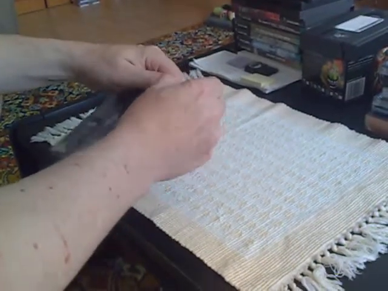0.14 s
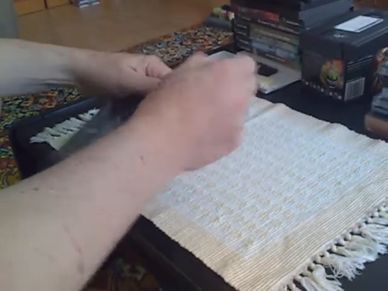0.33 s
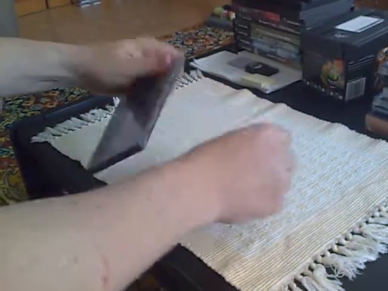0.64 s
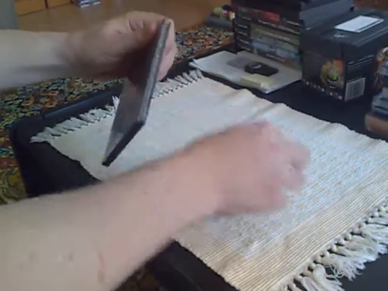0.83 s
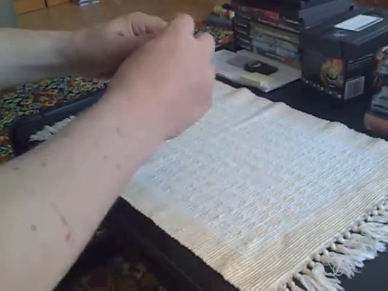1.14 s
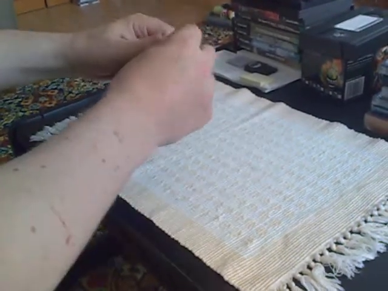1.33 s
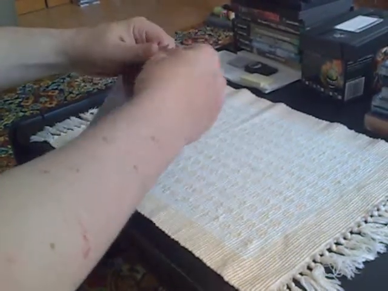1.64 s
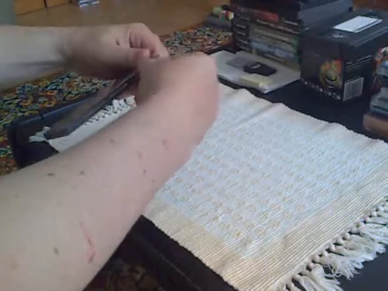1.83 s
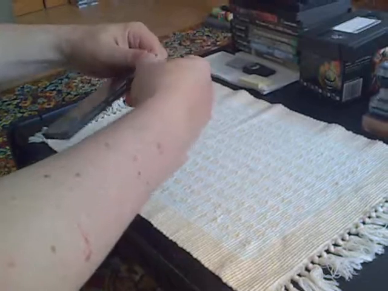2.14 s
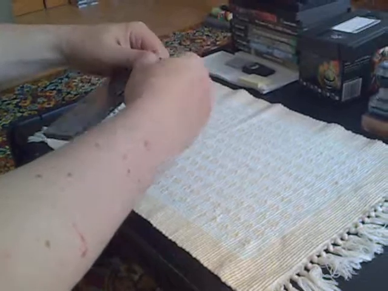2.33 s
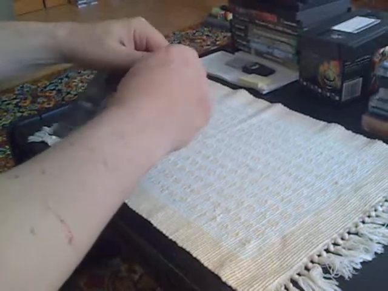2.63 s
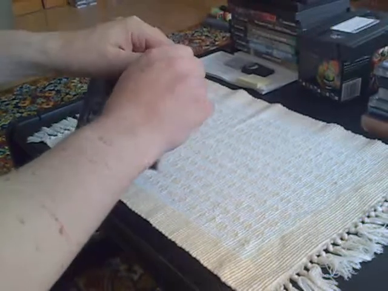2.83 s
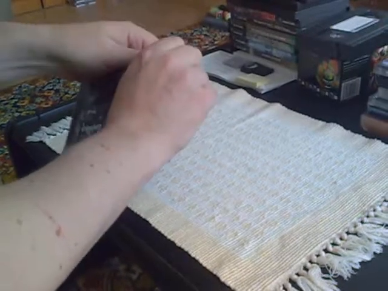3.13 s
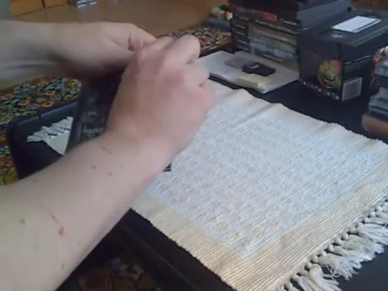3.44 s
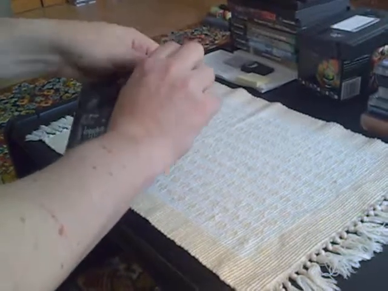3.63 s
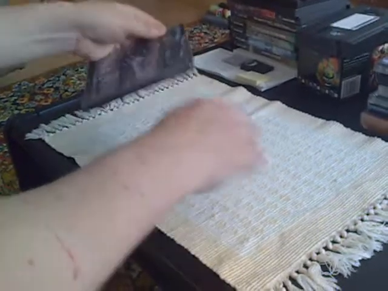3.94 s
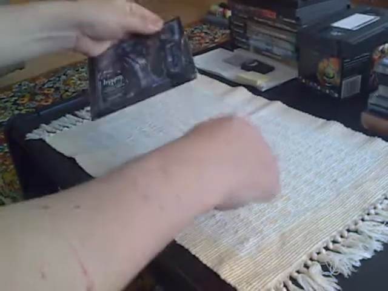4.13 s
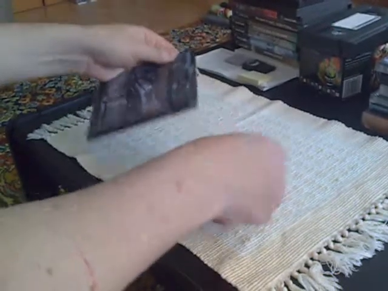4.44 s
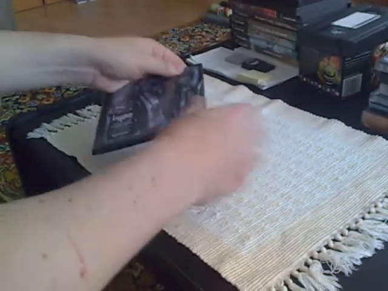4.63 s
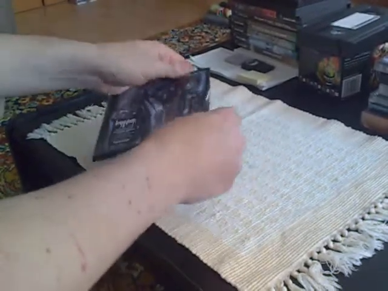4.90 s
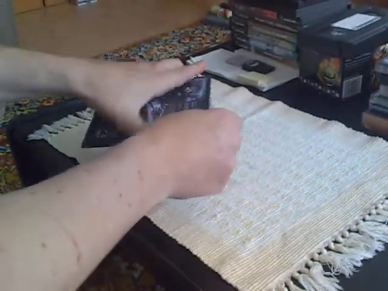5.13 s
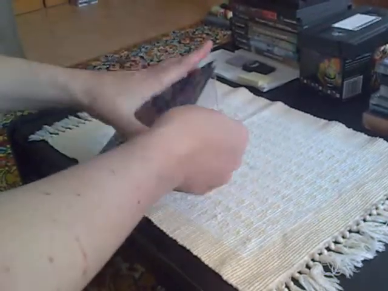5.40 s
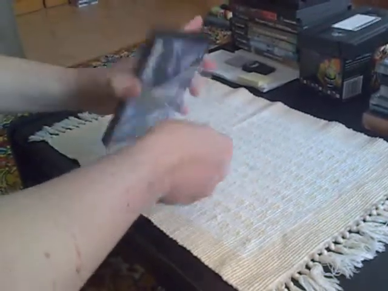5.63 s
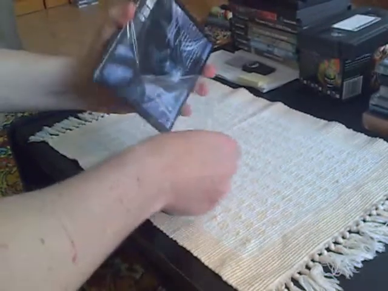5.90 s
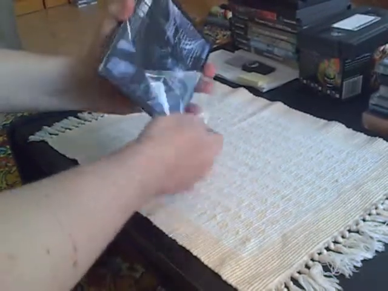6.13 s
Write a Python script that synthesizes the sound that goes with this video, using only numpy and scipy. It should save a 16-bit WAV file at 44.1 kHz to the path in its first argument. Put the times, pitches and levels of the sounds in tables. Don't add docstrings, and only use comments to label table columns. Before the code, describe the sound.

Close plastic wrap crinkles and snaps under fingers, tears in a crackling run, then comes free of its case with hard, bright cracks.

```python
import sys
import numpy as np
from scipy import signal
from scipy.fft import rfft, irfft
from scipy.io import wavfile
from scipy.ndimage import uniform_filter1d

SR = 44100
rng = np.random.default_rng(int(sys.argv[2]) if len(sys.argv) > 2 else 0)


def amp(db):
    return 10 ** (np.asarray(db, float) / 20)


def write(x):
    x = np.atleast_2d(x).T
    wavfile.write(sys.argv[1], SR, np.round(np.clip(x, -1, 1) * 32767).astype(np.int16))


N = 276066

# (frequency [Hz], width [Hz], level [dB])
SHEET_MODES = [(2500, 840, 7), (1725, 1780, -4.5)]
# (frequency [Hz], width [Hz], level [dB])
FOLD_MODES = [(3680, 1020, -1.5), (5970, 1080, 0.2)]
# (frequency [Hz], width [Hz], level [dB])
CREASE_MODES = [(10070, 1740, 7), (6800, 640, 0.38), (14840, 4100, 3)]


def set_rms(x, db):
    return x * amp(db) / np.sqrt(np.mean(x ** 2))


def resonate(x, modes):
    out = 0
    for k, (hz, width, db) in enumerate(modes):
        b, a = signal.iirpeak(min(hz, 0.45 * SR), hz / width, fs=SR)
        out = out + (-1) ** k * amp(db) * signal.lfilter(b, a, x)
    return out


def unit_gain(modes):
    power = sum(amp(2 * db) * np.pi * width / SR for hz, width, db in modes)
    return 1 / np.sqrt(power)


def background():
    # (frequency [Hz], density [dB per Hz])
    floor_curve = [(15, -2.5), (25, -1.5), (40, 0.5), (55, -6.5), (70, -9), (122, -16), (250, -16),
                   (400, -22), (900, -24), (2500, -28), (6000, -33), (10000, -34), (14500, -28.5),
                   (16000, -27.5)]
    # (time [s], rumble level [dB])
    rumble_curve = [(0.0, -48.5), (1.1, -50.5), (1.8, -51.5), (3.3, -45), (3.9, -48.5), (4.3, -46),
                    (5.0, -48), (6.26, -46)]
    # (frequency [Hz], level [dB], start [s], end [s])
    hum_lines = [(120, -61.5, 0.326, 2.9), (115.5, -60.5, 5.4, 7.9), (79.5, -61, 1.15, 2.5),
                 (76, -63.5, 4.1, 6.7), (288, -61.5, 4.2, 6.1), (238, -70.5, 1.65, 3.5),
                 (309, -69, 1.38, 5.2)]
    t = np.arange(N) / SR
    hz = np.maximum(np.arange(N // 2 + 1) * SR / N, 1)
    floor_hz, floor_db = np.array(floor_curve).T
    spectrum = amp(np.interp(np.log(hz), np.log(floor_hz), floor_db)) * rfft(rng.standard_normal(N))
    spectrum *= amp(-48) / np.std(irfft(spectrum, N))

    low = 1 / (1 + (hz / 75) ** 8.6)
    hiss = irfft(spectrum * np.sqrt(1 - low), N)
    rumble = set_rms(irfft(spectrum * np.sqrt(low), N), 0)
    out = hiss + amp(np.interp(t, *np.array(rumble_curve).T)) * rumble

    for line_hz, db, start, end in hum_lines:
        gate = np.clip(np.minimum(t - start, end - t) / 0.028, 0, 1)
        drift = set_rms(uniform_filter1d(rng.standard_normal(N), size=SR // 2), -10.5)
        phase = 2 * np.pi * line_hz * t + 2.2 * drift
        out += gate * set_rms(np.sin(phase), db)
    return out


def room(x):
    # (delay [s], level [dB])
    wall_echoes = [(.0098, -14), (0.0116, -18.5), (0.017, -20)]
    # (frequency [Hz], t60 [s], level [dB])
    tail_bands = [(440, 0.18, -15.5), (950, 0.18, -24), (1665, 0.2, -20), (2650, 0.18, -18),
                  (4260, 0.14, -12), (6480, 0.13, -13), (9500, 0.14, -17.5), (14200, 0.12, -15.5)]
    echoes = np.zeros(2048)
    taps = np.arange(24)
    for delay, db in wall_echoes:
        start = int(delay * SR)
        scattered = np.abs(rng.standard_normal(24)) * (-0.5) ** taps ** 2
        echoes[start:start + 24] += amp(db) * set_rms(scattered, -10 * np.log10(24))
    out = x + signal.fftconvolve(x, echoes)[:N]

    t = np.arange(SR // 2) / SR
    build = 1 / (1 + np.exp(-(t - 0.0095) / 0.0031))
    scatter = rng.standard_normal(N)
    for hz, t60, db in tail_bands:
        band = [(hz, hz * 0.58, 0)]
        sent, back = resonate(resonate(np.array([x, scatter]), band), band)
        decay = build * np.exp(-np.log(1000) * t / t60)
        stored = signal.oaconvolve(sent ** 2, decay ** 2)[:N]
        out += amp(db - 10.5) * set_rms(back, 0) * np.sqrt(np.maximum(stored, 0))
    return out


def blows(events):
    out = np.zeros(N + 8192)
    t = np.arange(8192) / SR
    for s, db, hz, t60, rise_ms in events:
        start = int(s * SR)
        rise = 1 - np.exp(-t / (rise_ms / 1000))
        ring = np.sin(2 * np.pi * hz * t) * np.exp(-np.log(1000) * t / t60)
        out[start:start + 8192] += amp(db + 4.0) * rise * ring
    return out[:N]


def thuds():
    # (time [s], peak level [dB], frequency [Hz], t60 [s], rise [ms])
    thud_events = [(.538, -26, 107, 0.026, 2.8), (.539, -34.5, 260, 0.018, 1.3),
                   (2.535, -36.5, 134, 0.06, 3.1), (3.699, -24.5, 89, 0.046, 3.7),
                   (4.287, -30, 306, 0.11, 2.1), (5.29, -41.5, 108, 0.089, 2.7),
                   (5.512, -34.5, 204, 0.066, 2.1), (5.765, -37.5, 170, 0.066, 3.7)]
    return blows(thud_events)


def knocks():
    # (time [s], peak level [dB], frequency [Hz], t60 [s], rise [ms])
    knock_events = [(.366, -25.5, 962, 0.022, 0.65), (2.582, -33, 495, 0.017, 0.94),
                    (2.5803, -15.5, 2660, .012, .3), (2.583, -22.5, 950, 0.015, 0.27),
                    (2.737, -40, 600, 0.021, 0.71), (3.297, -36.5, 1570, 0.022, 0.61),
                    (4.232, -36, 600, 0.016, 0.58), (4.260, -42.5, 682, 0.11, 0.18),
                    (4.287, -17, 1410, 0.015, 0.27), (4.288, -37, 1052, 0.16, 0.36),
                    (4.288, -32.5, 580, 0.037, 0.67), (4.5438, -13, 1860, 0.0026, 0.13),
                    (4.544, -55, 734, 0.0061, 0.41), (5.456, -33, 440, 0.014, 0.55),
                    (5.511, -17, 2200, 0.014, 0.24), (5.512, -42, 480, 0.019, 0.67)]
    return blows(knock_events)


def rustle():
    # (start [s], hold [s], rustle level [dB], brightness [dB], sheet ring [dB])
    strokes = [(0.2, .1, -75, -7, 0), (0.734, 0.079, -65, 4.5, 5.5), (2.717, 0.064, -65, -2, 0),
               (2.87, .4, -63.5, -9, -16), (3.601, 0.012, -64, 2, 8), (3.771, 0.017, -46, -10, 4),
               (3.835, 0.22, -54, -19, -9), (3.923, 0.11, -54.5, 4.5, 6.5), (4.224, 0.068, -53.5, -30, -15),
               (4.5, 0.019, -61, -2, 3), (4.953, 0.61, -61, -15, -15), (5.664, 0.093, -48, -17, -2),
               (5.756, 0.17, -64, -1, 4), (6.146, .13, -51, -20, -10)]
    # (frequency [Hz], width [Hz], level [dB])
    rub_modes = [(1080, 1740, 0)]
    ticks_per_s, spread_db, grain_s = 2600, 1, 0.0003
    strength = amp(spread_db * np.minimum(rng.exponential(size=N), 5.0))
    ticks = (rng.random(N) < ticks_per_s / SR) * strength
    grain = np.sqrt(signal.lfilter([1], [1, -np.exp(-1 / (grain_s * SR))], ticks ** 2))

    t = np.arange(N) / SR
    weights = 0
    for s, hold, db, bright_db, sheet_db in strokes:
        rise_db = 503 * np.maximum(s - t, 0)
        fall_db = 203 * np.maximum(t - s - hold, 0)
        weights = weights + amp([[0], [bright_db], [sheet_db]]) * amp(db - rise_db - fall_db)
    bodies = [set_rms(resonate(rng.standard_normal(N), modes), 0)
              for modes in (rub_modes, FOLD_MODES + CREASE_MODES, SHEET_MODES)]
    return set_rms(grain, 0) * np.sum(weights * bodies, axis=0)


def small_creases(events, case_db, sheet_db, fine_db):
    burst_ms = 1.8
    return [(s, db, case_db + slack, sheet_db + slack, fine_db - slack, burst_ms)
            for s, db, slack in events]


def snaps():
    # (time [s], peak level [dB], case share [dB], sheet share [dB], fine-crease share [dB])
    big_snaps = [(0.207, -32, -12.5, -13.5, -16), (0.321, -32.5, -20, -14, -3),
                 (0.3347, -20, -5.5, -10.5, -16), (0.3404, -9.5, -20, -14, -1.5),
                 (0.3662, -27, -7, -9, 1.5), (2.516, -38, -16, -25, 3.5), (2.581, -19.5, -6, -4.5, 1),
                 (2.7365, -21.5, -9.5, -10, -3), (2.8434, -22.5, -15.5, -17.5, 1),
                 (3.2964, -33.5, -4.5, -11, -17), (3.7445, -26, -20, -37, 0.5), (3.8423, -25, -10, -6.5, 4),
                 (4.2303, -51, 12, 3, -8), (4.2584, -32.5, -2, 0, 9), (4.2859, -17.5, -6, -15, -3.5),
                 (4.5422, -40, 8.5, 3, -25), (5.3832, -15, -24.5, -34, -7), (5.4539, -9.5, -9, -15.5, -3),
                 (5.51, -13.5, -1.5, -5.5, -6), (5.659, -30.5, -3.5, -0.5, 1), (5.7293, -19.5, -4, -14, -4),
                 (5.974, -32, -17.5, -21, -0.5), (6.1562, -25, -14.5, -32, -6),
                 (6.2012, -28.5, -14, -12, 2)]
    # (time [s], peak level [dB], slack [dB])
    tear_crackle = [(3.7535, -28, -4.5), (3.7744, -28, -6), (3.791, -26, -9.5), (3.8488, -32.5, -17),
                    (3.8622, -28, -6), (3.8708, -32, 0.5), (3.896, -53, 5), (3.9104, -31, -6),
                    (3.933, -24.5, 1.5), (3.9416, -31, 1), (3.9496, -24.5, -9), (3.962, -29, -2),
                    (3.984, -33, -2.5), (3.9987, -36, -3), (4.0211, -40, 8.5), (4.0354, -37, -5),
                    (4.0484, -37, 2), (4.0534, -52, -4)]
    # (time [s], peak level [dB], slack [dB])
    pull_crackle = [(5.6813, -25, -6.5), (5.7005, -35, 10), (5.7035, -36, 2), (5.7075, -49, -2),
                    (5.7115, -48, 2), (5.7489, -23, -8), (5.7386, -26.5, -2), (5.758, -29, -2),
                    (5.7696, -23, -8), (5.7846, -22.5, -5), (5.8006, -23, -8.5)]
    # (time [s], peak level [dB], slack [dB])
    lone_ticks = [(0.6604, -44, 0.5), (1.5796, -43.5, 3.5), (2.732, -31.5, -4), (2.822, -30, -12),
                  (2.921, -33, -6.5), (3.495, -40.5, -3.5), (3.603, -48.5, 11), (4.1378, -39.5, -9),
                  (4.194, -38.5, -5), (4.5024, -49, 9), (4.513, -43, 5), (4.5198, -44, 2),
                  (4.972, -37.5, -16), (5.0088, -32, -10), (5.028, -30.5, -6), (5.056, -48, -2),
                  (5.072, -40.5, 5), (5.1253, -58, -3), (5.273, -38.5, -4.5), (5.3207, -37, -7),
                  (5.8481, -35.5, -2.5), (5.856, -36, -9), (5.8788, -40.5, -10), (5.8928, -41, 2),
                  (5.9247, -62, -25), (6.0816, -42, -2), (6.1299, -37.5, -13), (6.139, -33, -6),
                  (6.219, -46, -7)]
    # (frequency [Hz], width [Hz], level [dB])
    case_modes = [(946, 136, 5), (1696, 307, -1.5), (600, 2200, -17)]
    bursts = [row + (2.5,) for row in big_snaps]
    bursts += small_creases(tear_crackle, case_db=-13.5, sheet_db=-3.4, fine_db=-8.5)
    bursts += small_creases(pull_crackle, case_db=-2, sheet_db=-5, fine_db=-6)
    bursts += small_creases(lone_ticks, case_db=-11, sheet_db=-7, fine_db=-13)

    push = np.zeros((4, N + 1024))
    t = np.arange(1024) / SR
    for s, db, case_db, sheet_db, fine_db, burst_ms in bursts:
        noise = rng.standard_normal((5, 1024))
        u = t / (burst_ms / 1000)
        shape = (1 - np.exp(-t / 0.0013)) * np.exp(-u ** 2) + 0.37 * np.exp(-u / 2)
        slips = amp(3.25 * set_rms(uniform_filter1d(noise[4], size=7), 0))
        shares_db = np.array([[0], [case_db + 7.0], [sheet_db + 14.0], [fine_db + 5.5]])
        start = int(s * SR)
        push[:, start:start + 1024] += amp(db - 5.5 + shares_db) * shape * slips * noise[:4]
    bodies = [FOLD_MODES, case_modes, SHEET_MODES, CREASE_MODES]
    return sum(unit_gain(modes) * resonate(x[:N], modes) for x, modes in zip(push, bodies))


def scene():
    in_room = room(snaps() + rustle() + knocks())
    return (in_room + thuds() + background())[None, :]


def low_pass(x):
    return signal.sosfilt(signal.butter(12, 16980, fs=SR, output="sos"), x)


def record(dry):
    top_cut = signal.ellip(8, 0.3, 38, 15850, fs=SR, output="sos")
    return low_pass(signal.sosfilt(top_cut, dry))


dry = scene()
out = record(dry)
write(out)
```